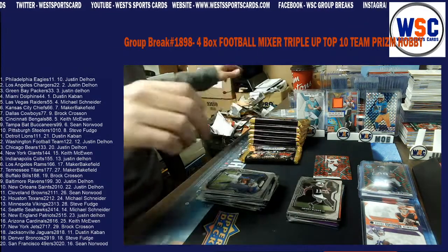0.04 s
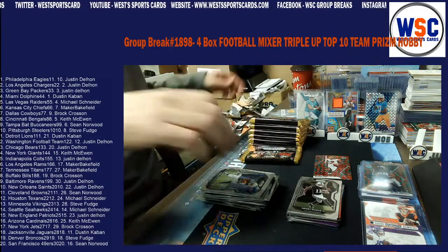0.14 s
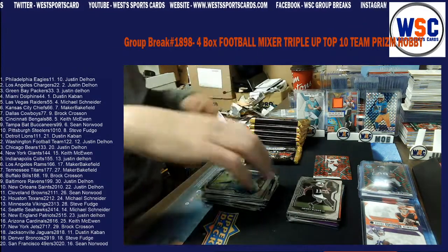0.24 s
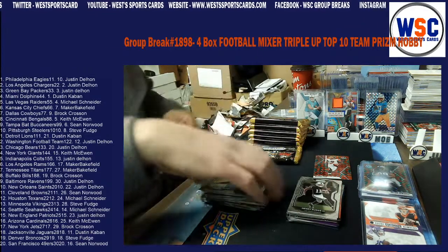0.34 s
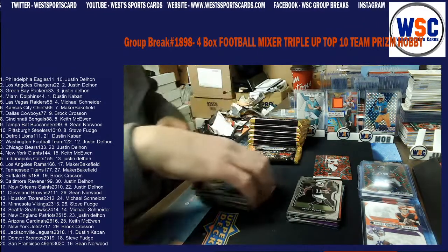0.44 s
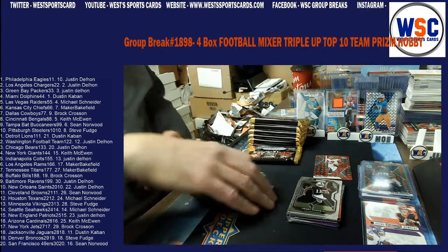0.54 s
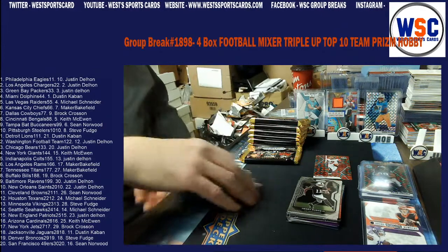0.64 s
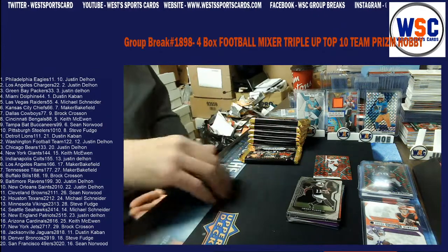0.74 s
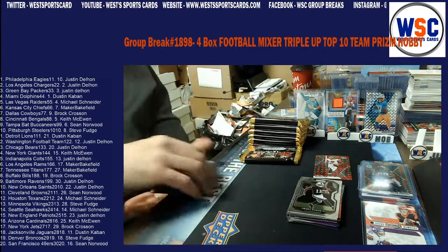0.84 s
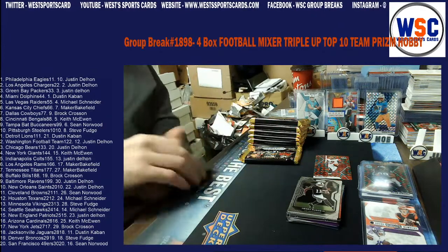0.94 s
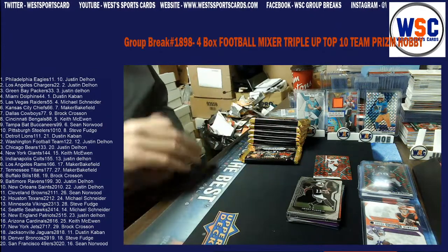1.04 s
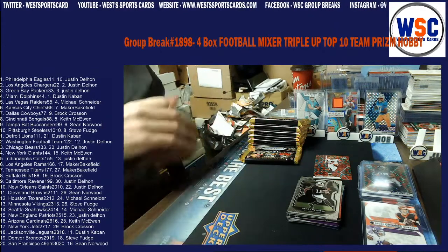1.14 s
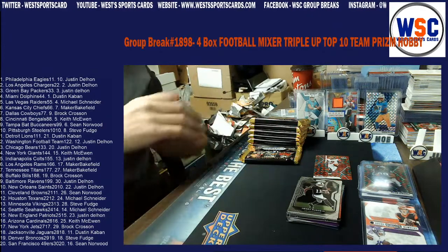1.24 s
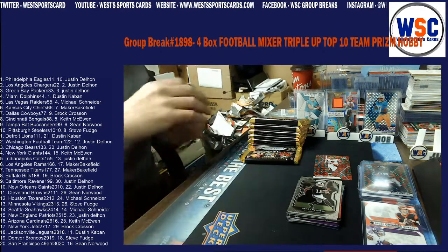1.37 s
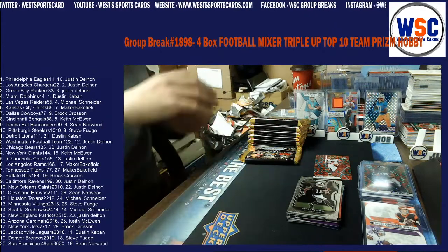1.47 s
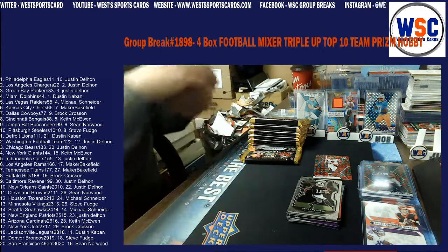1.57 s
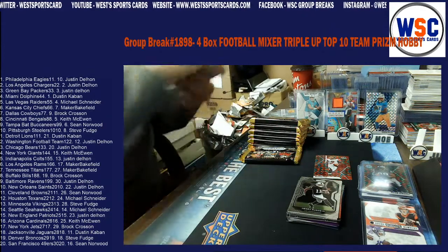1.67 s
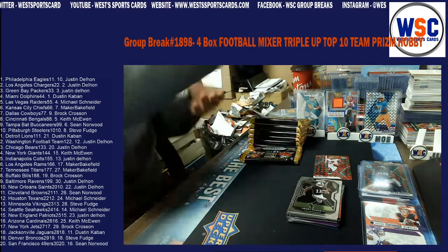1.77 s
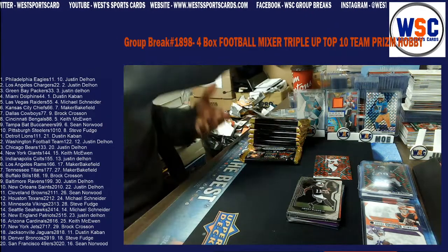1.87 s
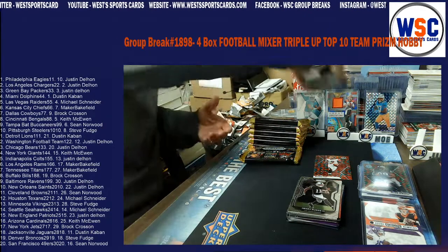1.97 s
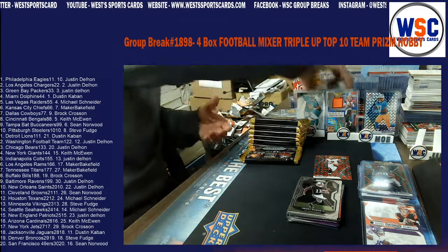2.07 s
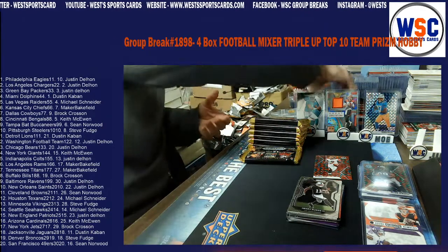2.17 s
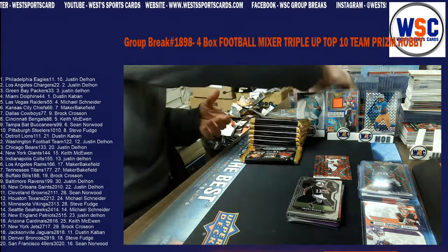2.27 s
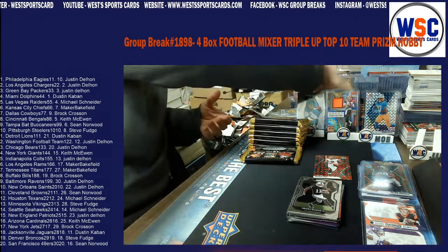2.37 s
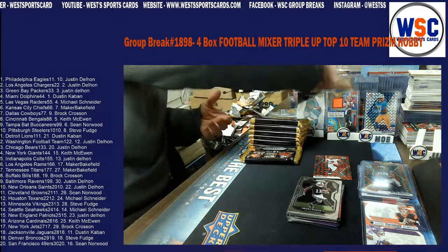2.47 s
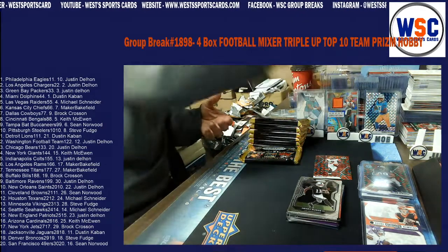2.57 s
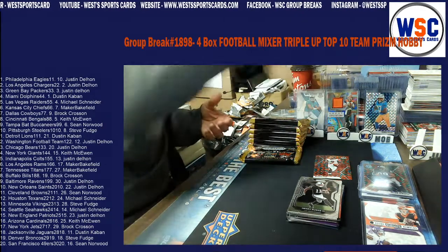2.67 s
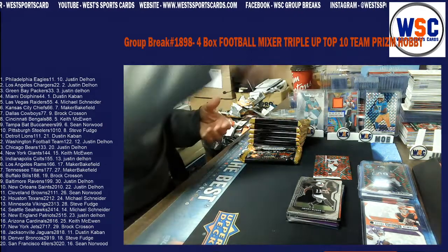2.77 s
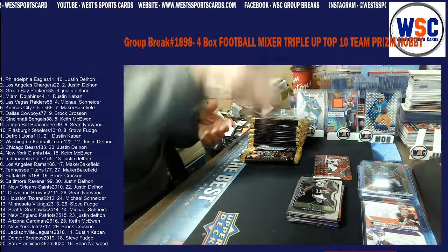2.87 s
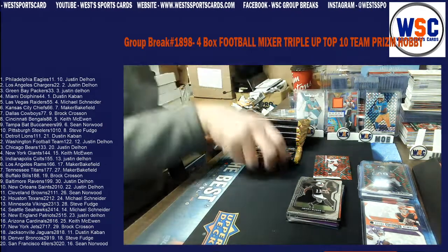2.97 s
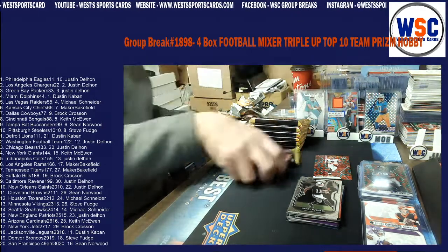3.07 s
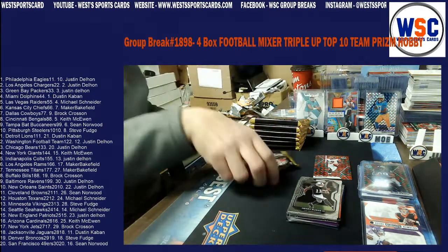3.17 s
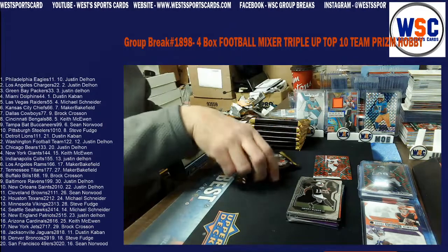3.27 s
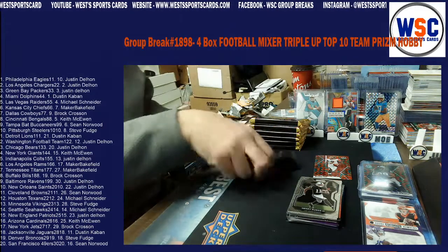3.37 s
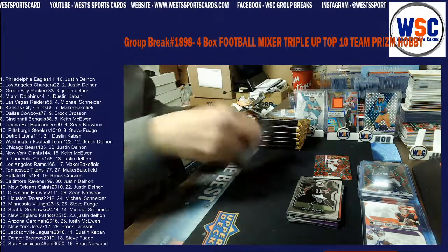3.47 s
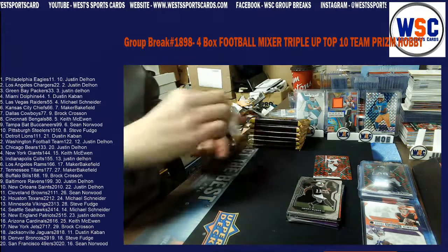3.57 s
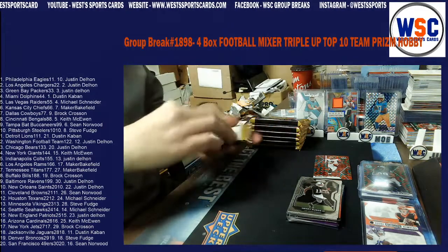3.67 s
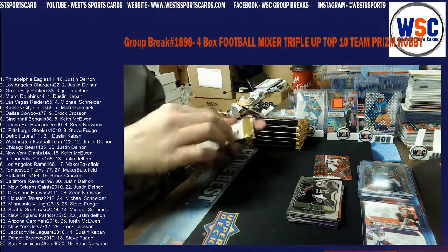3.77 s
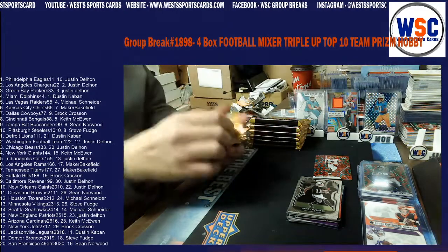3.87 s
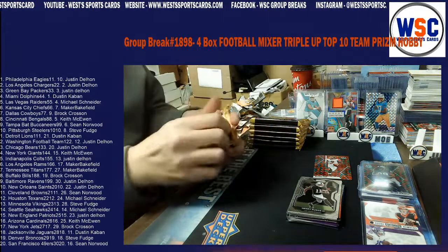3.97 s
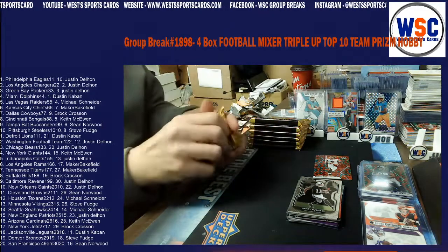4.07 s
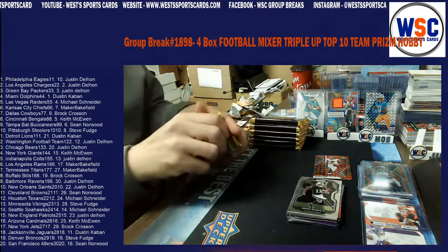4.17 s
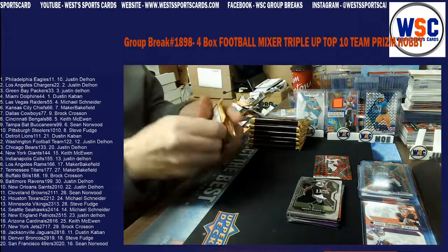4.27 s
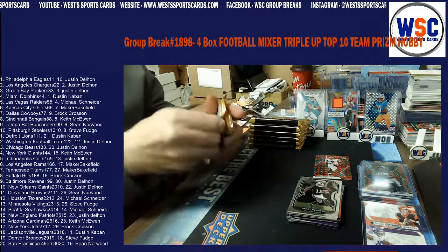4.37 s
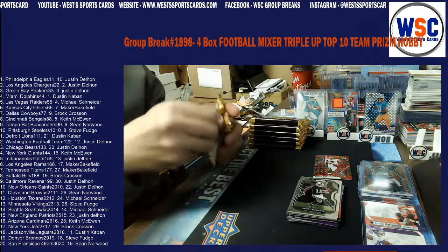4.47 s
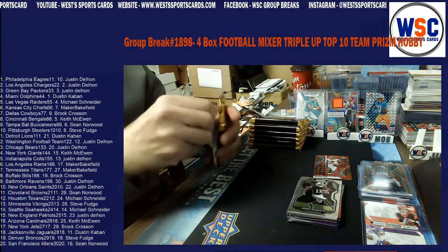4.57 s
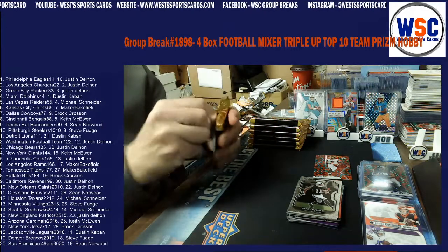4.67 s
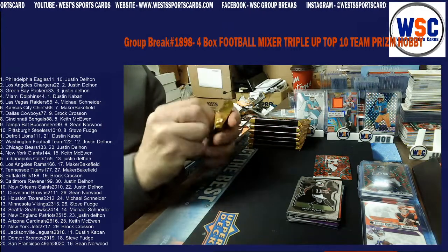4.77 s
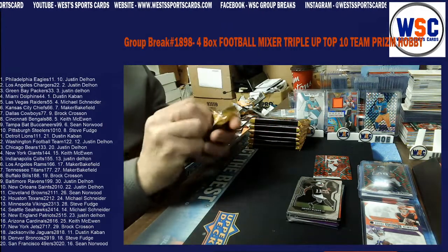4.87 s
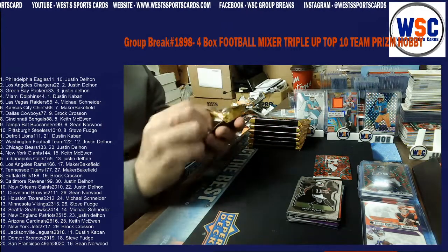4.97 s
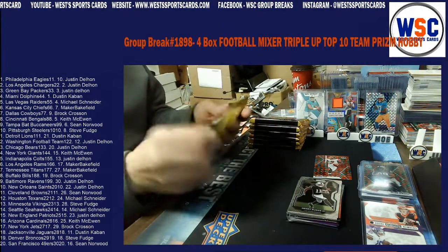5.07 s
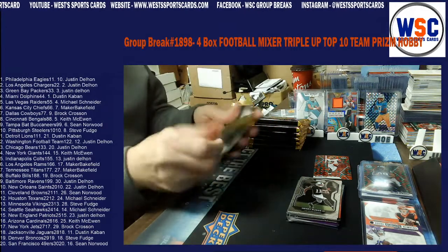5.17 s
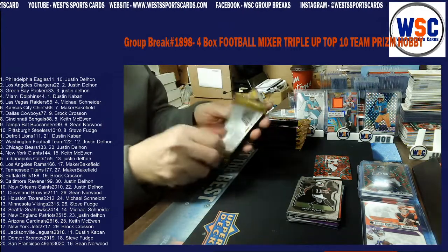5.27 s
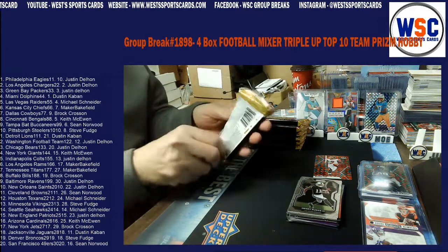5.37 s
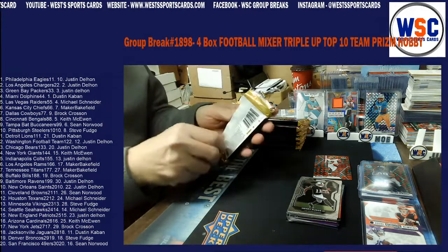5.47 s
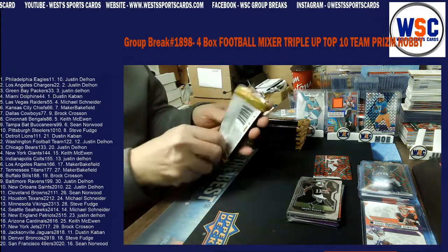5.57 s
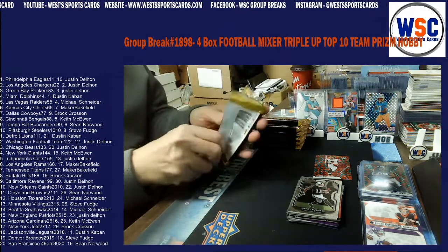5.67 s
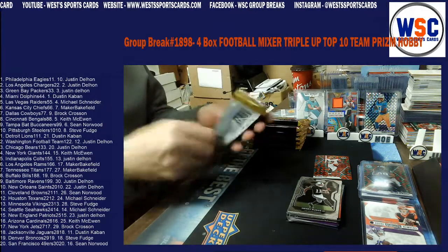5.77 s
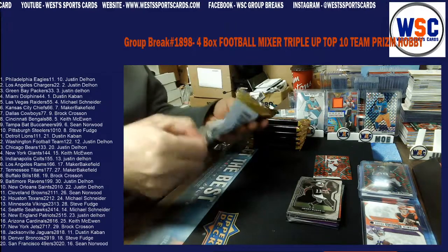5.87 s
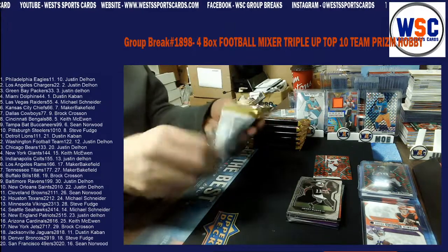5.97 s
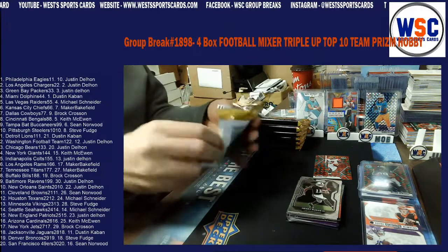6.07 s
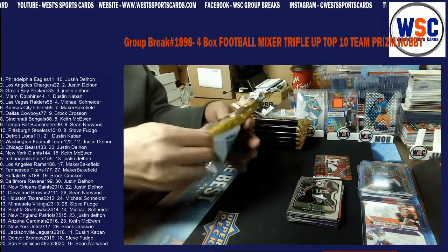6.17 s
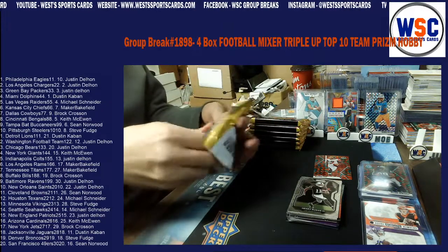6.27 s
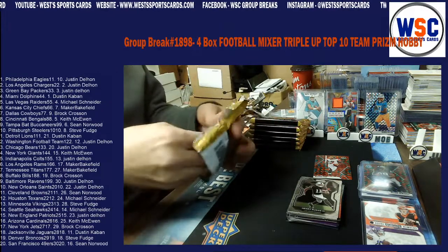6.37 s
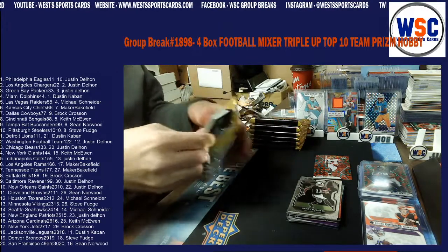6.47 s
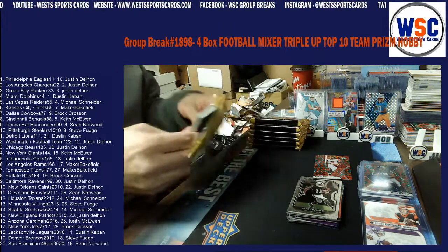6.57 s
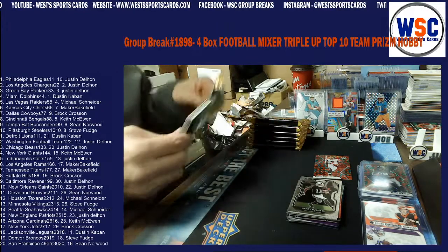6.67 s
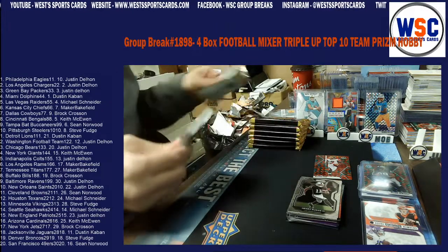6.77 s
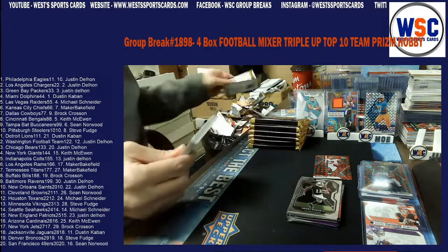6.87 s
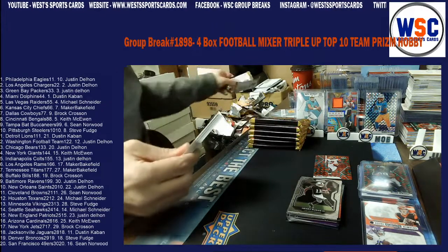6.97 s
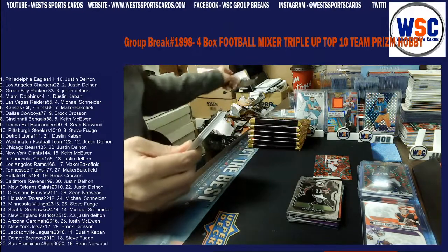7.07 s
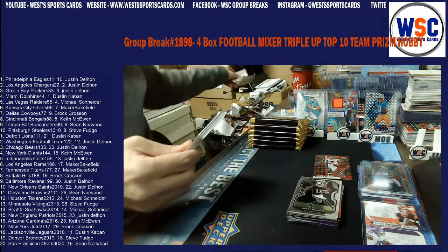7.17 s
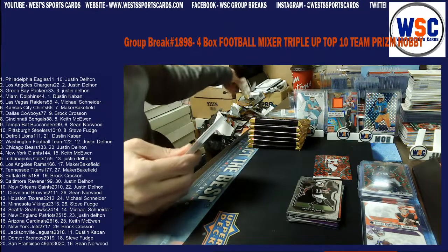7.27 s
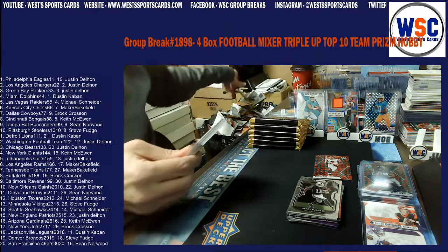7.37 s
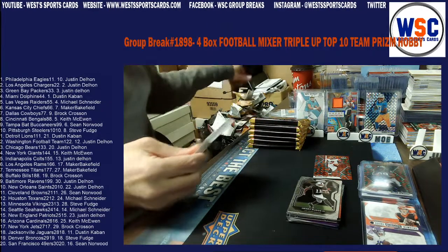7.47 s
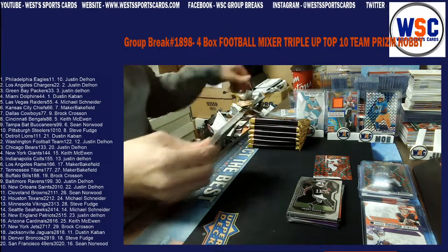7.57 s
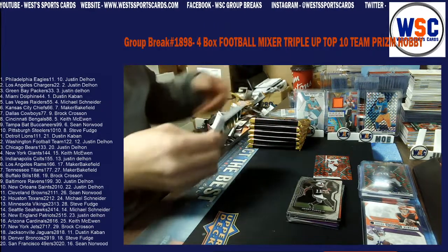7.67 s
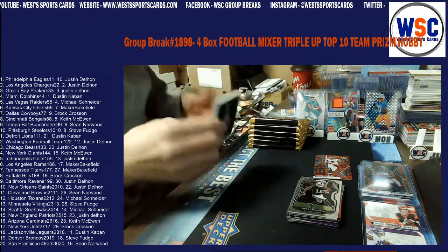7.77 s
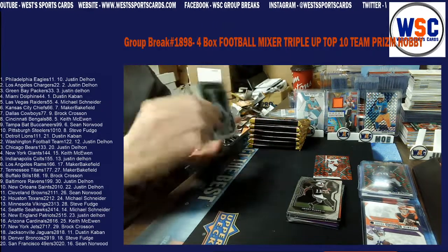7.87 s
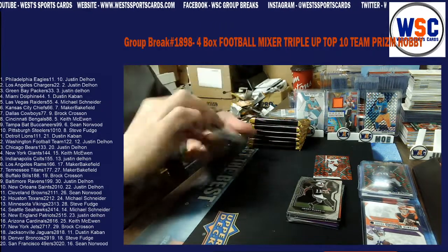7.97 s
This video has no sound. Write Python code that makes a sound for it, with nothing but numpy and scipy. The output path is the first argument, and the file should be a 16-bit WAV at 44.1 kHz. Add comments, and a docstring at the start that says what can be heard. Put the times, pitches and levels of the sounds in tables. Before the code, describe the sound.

Over a faint machine hum and fan, light card scuffs and a dull knock precede sharp, bright foil crackling and ripping, then small rustles.

```python
"""A foil pack is pinched, ripped open and peeled off its cards: creases snap, the seam tears.
Snaps are short runs of noise slips through damped resonances; crinkling and rips are dense random grains.
Before it, at a padded desk, a stack of trading cards is set aside and something is put down with a thud:
rubbing grains, struck desk modes and scuffs. Behind lie a low machine hum, a rumble and a fan, made of
sines and coloured noise, in a small room of decaying noise echoes heard by a close microphone pair."""
import sys
import numpy as np
from scipy import signal
from scipy.fft import rfft, irfft, next_fast_len
from scipy.io import wavfile
from scipy.ndimage import uniform_filter1d

SR = 44100
rng = np.random.default_rng(int(sys.argv[2]) if len(sys.argv) > 2 else 0)


def materialize(psi):
    """Save the field psi as 16-bit PCM at rate SR to the path in sys.argv[1].

    A 1-D psi becomes a single channel; in a 2-D psi each row is a channel.
    """
    bounded = np.clip(np.atleast_2d(psi).T, -1, 1)
    quanta = np.round(bounded * 32767).astype(np.int16)
    wavfile.write(sys.argv[1], SR, quanta)


N = 353682
TIME_S = np.arange(N) / SR
LEFT_RIGHT = np.array([[1], [-1]])


def from_db(db):
    """Decibels to amplitude gain."""
    return 10 ** (np.asarray(db) / 20)


def at_hz(points, hz):
    """Interpolate a spectrum table on a log-frequency axis."""
    point_hz, value = np.transpose(points)
    return np.interp(np.log(hz + 1), np.log(point_hz), value)


# likeness of the two microphones for sounds near the desk [freq_hz, correlation]
NEAR_LIKENESS = [(240, 1), (350, 0.92), (1100, 0.95), (1700, 0.8), (2900, 0.52), (3800, -0.24),
                 (5200, -0.25), (6600, 0.1), (9000, 0.53), (15000, 0.25)]


def colour(x, spectrum, likeness=NEAR_LIKENESS):
    """Causal filter of unit power gain; mixes two unrelated inputs into a left-right pair."""
    size = 2 * next_fast_len(N // 2 + SR // 4)
    hz = np.arange(size // 2 + 1) * SR / size
    top_hz = spectrum[-1][0]
    gain = from_db(at_hz(spectrum, hz)) / (1 + (hz / top_hz) ** 4)
    gain /= np.sqrt(np.mean(gain ** 2))
    # folded cepstrum: minimum phase, no sound before its cause
    cepstrum = irfft(np.log(gain))
    cepstrum[1:size // 2] *= 2
    cepstrum[size // 2 + 1:] = 0
    mid, side = rfft(x, size) * np.exp(rfft(cepstrum))
    alike = np.clip(at_hz(likeness, hz), -1, 1)
    pair = np.sqrt((1 + alike) / 2) * mid + LEFT_RIGHT * np.sqrt((1 - alike) / 2) * side
    return irfft(pair, size)[:, :N]


def panned(left_right_db):
    """Left and right gains for a level difference."""
    return from_db(LEFT_RIGHT * left_right_db / 2)


def from_right(x, delay_samples=3):
    """Sound from the right reaches the left microphone late."""
    return np.array([np.roll(x[0], delay_samples), x[1]])


def stroke(start_s, end_s, fade_s):
    """Gesture envelope: short linear rise, hold, exponential decay."""
    level = np.zeros(N)
    first = max(round((start_s - fade_s) * SR), 0)
    span = slice(first, round((end_s + 20 * fade_s) * SR))
    t = TIME_S[span]
    rise = np.clip((t - start_s) / fade_s + 1 / 2, 0, 1)
    level[span] = rise * np.exp(-np.maximum(t - end_s, 0) / fade_s)
    return level


def crackle(per_s, spread_db, grain_s=0.0026):
    """Tiny noise bursts of uneven size at random moments, power evened out to about one."""
    size_db = spread_db * np.minimum(rng.exponential(1, N), 4)
    energy = from_db(size_db) ** 2 * (rng.random(N) < per_s / SR)
    power = signal.lfilter([1], [1, -np.exp(-2 / (grain_s * SR))], energy + 1e-6)
    evened = power / uniform_filter1d(power, size=SR // 25)
    return rng.standard_normal((2, N)) * np.sqrt(evened)


def ring(x, hz, t60_s):
    """Damped resonator: a unit click starts a sine of height 1."""
    r = from_db(-60 / (t60_s * SR))
    w = 2 * np.pi * hz / SR
    return signal.lfilter([0, np.sin(w)], [1, -2 * r * np.cos(w), r * r], x + 1e-18)


# steady machine tones [freq_hz, level_db]
HUM = [(18.1, -42.5), (27.8, -49), (36.2, -48.5), (54.3, -50.5), (58.6, -50), (72.4, -72.5), (83, -55),
       (127, -59)]
# machinery rumble colour [freq_hz, relative_db]
RUMBLE = [(8, 3), (15, 8), (40, -4), (60, -6), (95, -2), (110, -16), (130, -10.5), (170, -17.5),
          (260, -26.5), (500, -40.5)]
# fan hiss colour [freq_hz, relative_db]
FAN = [(150, 2.5), (280, -10), (338, 11), (410, -3.5), (520, -1.5), (800, -9.5), (1170, -7), (1260, -1),
       (1380, -12), (2800, -18), (6000, -15), (9000, -21), (11500, -24), (16000, -21)]
# likeness of the two microphones for the room's diffuse air [freq_hz, correlation]
AIR_LIKENESS = [(140, 0.94), (245, 0.6), (340, 0.91), (600, 0.68), (850, 0.73), (1250, 0.83), (1550, 0.54),
                (2800, 0.012), (4500, -0.22), (6500, -0.25), (8200, 1), (12000, 1)]
RUMBLE_DB, FAN_DB = -41.5, -56.5


def background():
    """Steady sines hum over coloured-noise rumble; a fan adds soft resonant hiss."""
    hum = sum(np.sqrt(2) * from_db(level_db) * np.sin(2 * np.pi * (hz * TIME_S + rng.random()))
              for hz, level_db in HUM)
    rumble = from_db(RUMBLE_DB) * colour(rng.standard_normal((2, N)), RUMBLE, AIR_LIKENESS)
    fan = from_db(FAN_DB) * colour(rng.standard_normal((2, N)), FAN, AIR_LIKENESS)
    return from_right(hum + rumble) * panned(1) + fan


# light touches on cards and wrappers [start_s, length_s, level_db]
TOUCHES = [(0.275, 0.017, -57), (0.352, 0.013, -55.5), (0.404, 0.051, -51.5), (0.533, 0.33, -60.5),
           (0.908, 0.039, -59.5), (1.107, 0.017, -61.5), (1.25, 0.048, -64.5), (1.367, 0.053, -62.5),
           (2.84, .004, -61), (6.928, 0.022, -54), (7.063, 0.0067, -51.5), (7.103, 0.025, -53.5),
           (7.233, 0.036, -49.5), (7.288, 0.012, -42), (7.415, .004, -61), (7.547, 0.0035, -59),
           (7.76, 0.25, -67.5)]
# rubbing colour [freq_hz, relative_db]
TOUCH_COLOUR = [(800, -6), (2000, -5), (4500, 2), (7800, 3.5), (10000, -3.5), (15000, -33)]


def cards():
    """Fingers and card faces rub with a fine grain."""
    pressure = sum(from_db(level_db) * stroke(start_s, start_s + length_s, fade_s=0.01)
                   for start_s, length_s, level_db in TOUCHES)
    return colour(crackle(per_s=1200, spread_db=2.0) * pressure, TOUCH_COLOUR)


# blows on the desk [start_s, contact_s, ring_db, scuff_db]
KNOCKS = [(0.614, 0.017, -61, -46.5), (0.635, 0.037, -42, -43.5), (0.681, 0.011, -37, -55),
          (0.701, .004, -43, -62), (2.276, 0.0025, -38, -43), (2.2916, 0.01, -32, -28.5),
          (2.294, 0.0034, -27, -44), (2.299, 0.0032, -17, -43)]
# desk-top modes [freq_hz, relative_db, t60_s]
DESK_MODES = [(64.4, 0, 0.13), (180, 0, 0.064), (322, -4.5, 0.064), (463, -5.5, 0.063), (670, -5, 0.0079),
              (766, -24, 0.041), (1096, -10, 0.016)]
# scuff colour against the mat [freq_hz, relative_db]
SCUFF_COLOUR = [(150, 5), (450, 1.5), (780, 5.5), (1400, -4.5), (1900, -2.5), (3100, -10), (3700, -15),
                (4700, -11.5), (8000, -20), (15000, -45)]


def desk():
    """A padded blow rings the desk-top modes while the object scuffs against the mat."""
    blows, contact = np.zeros(N), np.zeros(N)
    for start_s, contact_s, ring_db, scuff_db in KNOCKS:
        blows[round(start_s * SR)] = from_db(ring_db)
        contact += from_db(scuff_db) * stroke(start_s, start_s + contact_s, fade_s=0.0039)
    thuds = np.zeros(N)
    for k, (hz, relative_db, t60_s) in enumerate(DESK_MODES):
        sign = (-1) ** (k + 1)
        thuds += sign * from_db(relative_db) * ring(blows, hz, t60_s)
    scuffs = colour(crackle(per_s=1500, spread_db=0.5) * contact, SCUFF_COLOUR)
    return thuds * panned(2.6), scuffs


def flex(x, depth_db, count=8):
    """As the sheet bends, its broad resonances swell and fade at random."""
    knots_s = np.arange(0, N / SR + .1, .025)
    out = x
    for hz in np.geomspace(1000, 10000, count):
        swell_db = depth_db * np.clip(rng.standard_normal(len(knots_s)), -2, 2)
        swell = np.interp(TIME_S, knots_s, from_db(swell_db) - 1)
        out = out + swell * signal.lfilter(*signal.iirpeak(hz, 4, fs=SR), x)
    return out


# loud buckling creases [start_s, crack_db, flap_db, facet_hz]
SNAPS = [(3.1005, -26.5, -59, 6400), (3.2465, -32, -38.5, 4000), (3.27, -24, -31.5, 6560),
         (3.2874, -18.5, -38, 3430), (3.304, -32, -30.5, 4640), (3.3266, -29, -44, 4200),
         (3.3911, -25.5, -40, 6160), (3.407, -23.5, -37.5, 6100), (3.469, -26, -60, 8400),
         (3.4848, -29.5, -42, 7640), (3.5802, -26, -36, 6900), (3.618, -23.5, -36.5, 5000),
         (3.7176, -35.5, -51, 7500), (3.7826, -19.5, -35.5, 5900), (3.9548, -29.5, -53, 7140),
         (3.994, -26, -47, 6270), (4.0553, -30.5, -37, 4840), (4.163, -19.5, -35, 7100),
         (4.1873, -21, -57, 8300), (4.265, -30.5, -65, 8800), (4.279, -30.5, -47.5, 6500),
         (4.3776, -23, -29, 8500), (4.3993, -30, -35.5, 4500), (4.4408, -29, -63.5, 8350),
         (4.4646, -27, -51, 7760), (4.5016, -29, -44.5, 10200), (4.5697, -22, -37, 7500),
         (4.6251, -18, -33, 5160), (4.641, -11.5, -41, 6860), (4.6927, -17.5, -43, 6360),
         (4.772, -23, -44.5, 6200), (4.7915, -13, -29.5, 5900), (4.8585, -20.5, -34.5, 2840),
         (4.9052, -9.5, -27.5, 3320), (4.9366, -21, -31.5, 6430), (4.9516, -11.5, -24.5, 5800),
         (5.067, -28, -45, 6170), (5.123, -26.5, -39, 7440), (5.1384, -17, -42, 6150),
         (5.2106, -18, -38, 7800), (5.3197, -30.5, -54, 5500), (5.3656, -29.5, -39, 4000),
         (5.466, -30, -47, 5860), (5.4854, -24.5, -40, 8600), (5.6397, -17.5, -44.5, 7900),
         (5.6824, -10, -37.5, 8600), (5.7043, -15.5, -31.5, 6300), (5.7709, -16.5, -18, 5800),
         (5.8451, -17.5, -33, 4100), (5.8866, -17.5, -29.5, 6960), (5.9082, -26, -34, 7000),
         (5.9198, -14.5, -23.5, 8500), (6.0342, -22.5, -31.5, 3530), (6.0682, -23.5, -30.5, 4300),
         (6.1542, -29, -39, 5200), (6.179, -17.5, -27, 6440), (6.2132, -21.5, -47, 9800),
         (6.3026, -14.5, -31, 7160), (6.355, -26.5, -37, 4250), (6.4785, -25.5, -40.5, 5200),
         (6.6443, -39, -48.5, 3470)]


def tension(hold_s, hush_db):
    """Gain for the fine crackle: the sheet strains quietly before each loud crease gives way."""
    gain = np.ones(N)
    for start_s, *_ in SNAPS:
        gain[round((start_s - hold_s) * SR):round(start_s * SR)] = from_db(hush_db)
    return uniform_filter1d(gain, size=SR // 500)


FIRM_GRIP_DB, FIRM_FLAP_DB = -40, -49
FLAP_FOLLOWS = 0.78  # flap dB per grip dB


def flapping(grip_db):
    """The sheet flaps more under a harder grip, gaining less than the crackle does."""
    return FIRM_FLAP_DB + FLAP_FOLLOWS * (grip_db - FIRM_GRIP_DB)


# how hard the fingers work the foil [time_s, grip_db]
GRIP = [(3.17, -60), (3.28, -40.5), (3.44, -39.5), (3.53, -53.5), (3.84, -50.5), (4.0, -39.5), (4.42, -41),
        (4.62, -31), (4.88, -41.5), (5.03, -35.5), (5.3, -38.5), (5.42, -61.5), (5.62, -47), (5.92, -35.5),
        (6.33, -40), (6.42, -64.5), (6.56, -47), (6.72, -69.5)]
CREASES_PER_S, CREASE_OVER_GRIP_DB, CREASE_OVER_FLAP_DB, CREASE_SPREAD_DB = 15, 8.5, 3.5, 1.5
CREASE_HZ, CREASE_SPREAD_OCTAVES = 6300, .4


def small_creases():
    """Lesser creases buckle at uneven moments, as strongly as the foil is gripped; rows like SNAPS."""
    draws = rng.standard_normal((200, 4))
    start_s = GRIP[0][0] + (np.arange(len(draws)) + 1 + draws[:, 0] / 2) / CREASES_PER_S
    grip_db = np.interp(start_s, *np.transpose(GRIP))
    crack_db = grip_db + CREASE_OVER_GRIP_DB + CREASE_SPREAD_DB * draws[:, 1]
    flap_db = flapping(grip_db) + CREASE_OVER_FLAP_DB + CREASE_SPREAD_DB * draws[:, 2]
    facet_hz = CREASE_HZ * 2 ** (CREASE_SPREAD_OCTAVES * np.clip(draws[:, 3], -2, 2))
    return np.transpose([start_s, crack_db, flap_db, facet_hz])[start_s < GRIP[-1][0]]


SLIP_RISE_S = 0.0011


def buckle(facet_hz, run_s, settle_s, settle_db, facet_share):
    """A crease gives way: a quick run of slips, then settling, through three damped facets."""
    t = np.arange(SR // 20) / SR
    decay = np.exp(-t / run_s) + from_db(settle_db) * np.exp(-t / settle_s)
    slips = rng.standard_normal((2, len(t))) * (1 - np.exp(-t / SLIP_RISE_S)) * decay
    neighbour_hz = facet_hz * 2 ** rng.uniform(-1, .7, 2)
    neighbours = sum(ring(slips, min(hz, SR / 3), 11 / hz) for hz in neighbour_hz)
    facets = ring(slips, facet_hz, 11 / facet_hz) + neighbours / 2
    snap = slips / np.linalg.norm(slips) + facet_share * facets / np.linalg.norm(facets)
    return snap / np.linalg.norm(snap) * np.sqrt(2)  # mean energy 1 per channel


PANEL_HZ, PANEL_AT_DB, PANEL_DB_PER_OCTAVE = 1585, -36.5, 25.5


def snaps(crack_gain_db, flap_gain_db, length_s):
    """Each buckling crease cracks in the treble and flaps the sheet; louder flaps move wider, deeper panels."""
    cracks, flaps = np.zeros((2, 2, N))
    for start_s, crack_db, flap_db, facet_hz in [*SNAPS, *small_creases()]:
        crack = buckle(facet_hz, run_s=.0032, settle_s=.011, settle_db=-15, facet_share=0.99)
        panel_hz = PANEL_HZ * 2 ** ((PANEL_AT_DB - flap_db) / PANEL_DB_PER_OCTAVE)
        flap = buckle(panel_hz, run_s=.0025, settle_s=.009, settle_db=-10, facet_share=0.67)
        first = round(start_s * SR)
        span = slice(first, first + crack.shape[1])
        cracks[:, span] += from_db(crack_db + crack_gain_db) * crack
        flaps[:, span] += from_db(flap_db + flap_gain_db) * flap
    return np.array([cracks, flaps]) * np.sqrt(length_s * SR)


# left-right treble balance [freq_hz, left_right_db]
BALANCE = [(300, -2), (2200, 0), (3500, -1), (4500, 2.5), (6000, -1.5), (8000, -1.5), (9500, -9),
           (15000, 0.5)]


def lean(x):
    """The two microphones hear the crack's spectrum differently."""
    size = 2 * next_fast_len(N // 2 + 1)
    hz = np.arange(size // 2 + 1) * SR / size
    return irfft(rfft(x, size) * panned(at_hz(BALANCE, hz)))[:, :N]


# dense tiny slips as the foil slides or tears [start_s, end_s, crack_db, flap_db]
RIPS = [(2.933, 3.013, -51, -52.5), (2.994, 3.082, -39.5, -48.5), (3.238, 3.428, -45.5, -46),
        (3.589, 3.62, -38, -47), (3.782, 3.842, -44.5, -43), (4.112, 4.19, -25.5, -36),
        (4.596, 4.675, -35, -38), (4.782, 4.831, -23.5, -31), (4.937, 4.987, -18.5, -26.5),
        (5.198, 5.231, -25.5, -33), (5.601, 5.677, -29.5, -45.5), (5.682, 5.777, -20.5, -28.5),
        (6.154, 6.189, -26, -52), (6.488, 6.569, -32.5, -41)]
# colour of the small stiff facets [freq_hz, relative_db]
CRACK_COLOUR = [(1500, -26), (2600, -14.5), (3600, -10), (5000, -4.5), (6300, 0), (7500, -3), (9000, -5.5),
                (10500, -11), (13000, -21.5), (16000, -41)]
# colour of the whole sheet [freq_hz, relative_db]
FLAP_COLOUR = [(110, -4), (250, -19), (370, -1), (520, -11.5), (660, -7), (880, -8), (1100, -0.5),
               (1350, -9.5), (1650, 0), (2100, 6.5), (2600, 4.5), (3600, -7)]
# the pack turns in the hands [time_s, left_right_db]
TURN = [(3.0, 2.5), (3.8, 0), (4.4, 1), (4.75, 1), (5.0, 3.5), (5.15, -0.5), (5.75, 0.5), (6.3, 0.5)]


def foil(crinkle_gain_db, rip_gain_db):
    """Snaps, fine crinkling and rips drive the same sheet; its cracks pan as it turns in the hands."""
    fine = flex(crackle(per_s=500, spread_db=2.8), depth_db=4)
    fine = fine * tension(hold_s=.012, hush_db=-5)
    tearing = flex(crackle(per_s=1100, spread_db=2.6), depth_db=3.5)
    grip_db = np.interp(TIME_S, *np.transpose(GRIP), left=-120, right=-120)
    pull = sum(from_db([[crack_db], [flap_db]]) * stroke(start_s, end_s, fade_s=0.0052)
               for start_s, end_s, crack_db, flap_db in RIPS)
    excite = snaps(crack_gain_db=-1.0, flap_gain_db=-1.5, length_s=0.0039)
    for k, level_db in enumerate([grip_db, flapping(grip_db)]):
        excite[k] += fine * from_db(level_db + crinkle_gain_db)
        excite[k] += tearing * pull[k] * from_db(rip_gain_db)
    cracks = lean(colour(excite[0], CRACK_COLOUR))
    flaps = colour(excite[1], FLAP_COLOUR)
    turn = panned(np.interp(TIME_S, *np.transpose(TURN)))
    return cracks * turn + from_right(flaps)


def echoes(t60_s, delay_s, shared_hz):
    """Decaying noise reflections of unit energy, alike at both microphones in the bass."""
    t = np.arange(SR // 2) / SR
    left, right = rng.standard_normal((2, len(t)))
    lowpass = signal.butter(2, shared_hz, fs=SR, output="sos")
    shared_bass = signal.sosfiltfilt(lowpass, left - right)
    train = np.array([left, right + shared_bass]) * from_db(-60 * t / t60_s) * (t > delay_s)
    return train / np.linalg.norm(train, axis=1, keepdims=True)


DESK_ECHO_T60_S, DESK_ECHO_DB = .02, -9.0
ROOM_T60_S, ROOM_DB = 0.086, -10.5


def room(x):
    """Direct sound, quick reflections off the desk and boxes, then the room's short tail."""
    response = from_db(DESK_ECHO_DB) * echoes(DESK_ECHO_T60_S, delay_s=0.0009, shared_hz=2376)
    response += from_db(ROOM_DB) * echoes(ROOM_T60_S, delay_s=0.0074, shared_hz=1600)
    response[:, 0] += 1
    return signal.fftconvolve(x, response, axes=1)[:, :N] / np.sqrt(1 + from_db(DESK_ECHO_DB) ** 2)


def scene():
    """Hands at work on the desk, in the humming room."""
    air = background()
    touches = cards()
    thuds, scuffs = desk()
    pack = foil(crinkle_gain_db=-2.0, rip_gain_db=-1.0)
    return room(pack + touches + scuffs) + thuds + air


CUTOFF_HZ, FULL_SCALE = 15750, .9


def record(dry):
    """The converter holds peaks at full scale, cuts the top and adds a small offset."""
    held = np.clip(dry, -FULL_SCALE, FULL_SCALE)
    lowpass = signal.ellip(10, .1, 80, CUTOFF_HZ, fs=SR, output="sos")
    offset = np.array([[-.017], [-.031]])
    return signal.sosfilt(lowpass, held) + offset


dry = scene()
out = record(dry)
materialize(out)
```